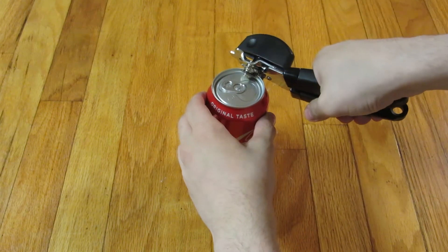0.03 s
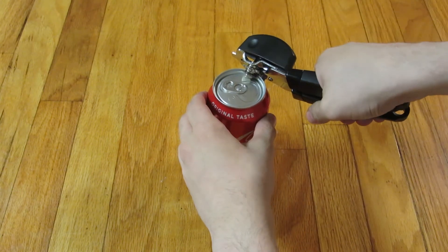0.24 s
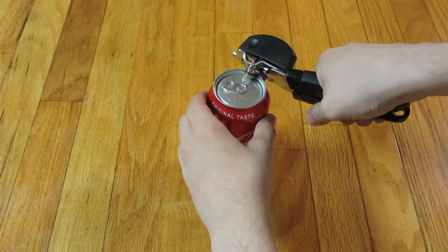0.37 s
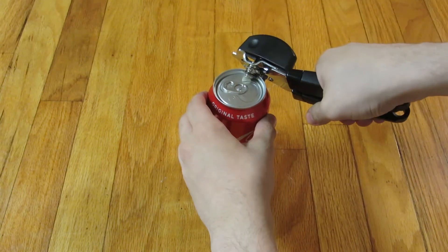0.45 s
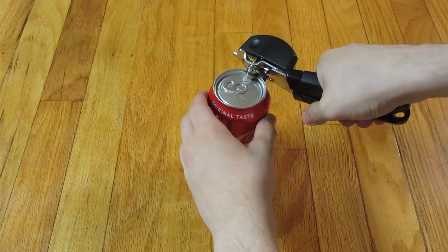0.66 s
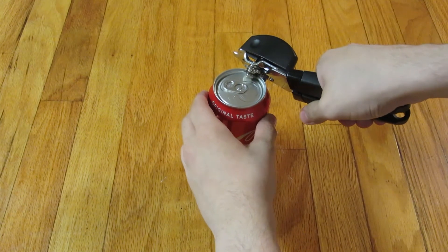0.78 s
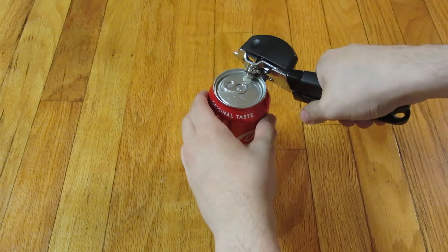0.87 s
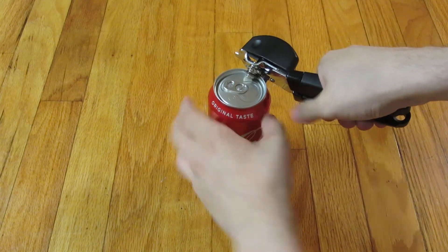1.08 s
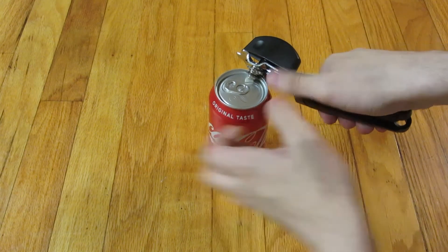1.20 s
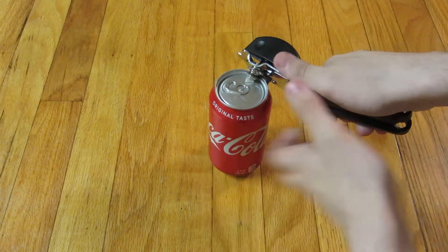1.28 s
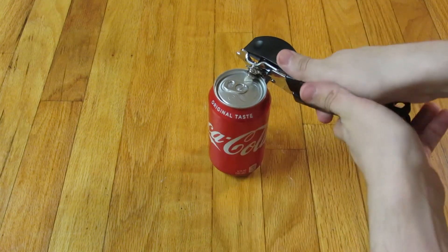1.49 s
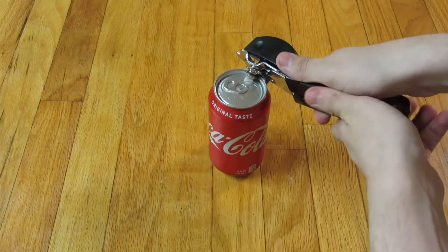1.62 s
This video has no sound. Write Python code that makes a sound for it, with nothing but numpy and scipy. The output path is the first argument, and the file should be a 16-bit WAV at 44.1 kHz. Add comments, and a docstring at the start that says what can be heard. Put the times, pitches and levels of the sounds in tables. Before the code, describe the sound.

One sharp crack comes as an opener's blade punctures a soda can on a wooden floor in a small room. A thin, sputtering fizz follows, with faint ticks and hand rubbing, before opening into a stronger high hiss.

```python
"""Piercing a can of fizzy drink

A hand opener bites into the rim of a can on a wooden floor, in a small live room. The blade snaps
through, an impulse that sets lid, opener and floorboards ringing. Gas seeps from the wet cut as
turbulent noise, spitting and whistling in short sputters. The tool ticks faintly as the grip
changes, then the cut widens and the gas hisses freely."""
import sys
import numpy as np
from scipy import signal
from scipy.fft import rfft, irfft
from scipy.io import wavfile
from scipy.ndimage import uniform_filter1d

SR = 44100
rng = np.random.default_rng(int(sys.argv[2]) if len(sys.argv) > 2 else 0)


def master_out(mix):
    """Clip the mix to full scale and print it as 16-bit PCM to the path in sys.argv[1]."""
    frames = np.transpose(np.atleast_2d(mix))
    ceiling = np.clip(frames, -1, 1)
    pcm = np.round(ceiling * 32767).astype(np.int16)
    wavfile.write(sys.argv[1], SR, pcm)


N = 72765

# Spectrum of the room noise. Each row: frequency in Hz, relative level in dB.
AIR_COLOUR = [(15, -21.5), (30, -12.5), (55, -9), (85, -10.5), (190, -14.5), (240, -12), (300, -13.5),
              (400, -8.5), (500, -12), (1000, -11.5), (2200, -20.5), (5000, -24.5), (8000, -29),
              (9000, -29.5), (15500, -38)]
# Likeness of that noise at the two ears. Each row: frequency in Hz, correlation.
AIR_CORRELATION = [(40, -.45), (120, -.2), (250, -0.42), (550, -0.84), (1200, -0.77), (3000, -0.69),
                   (12000, -0.51)]
# Balance of that noise. Each row: frequency in Hz, left minus right in dB.
AIR_BALANCE = [(40, -4.5), (250, -2.5), (600, 0), (2000, 0), (10000, 0)]
# Modes of lid, can and opener. Each row: frequency in Hz, relative level in dB, T60 in seconds.
METAL_MODES = [(387, -24, .06), (586, -27.5, 0.077), (1144, -20.5, 0.031), (1448, -21.5, 0.05),
               (2246, -25.5, .035), (2343, -14, .045), (2514, -8, 0.036), (2706, -20, 0.026),
               (2860, -19.5, 0.039), (3220, -13, 0.027), (3930, -20, 0.04), (4330, -13.5, 0.045),
               (4580, -19.5, 0.03), (4984, -10.5, 0.042), (5457, -18, .04), (6440, -23.5, .03),
               (6870, -25, 0.045), (8470, -20.5, 0.044)]
# Modes of the floorboards. Each row: frequency in Hz, level in dB, T60 in seconds.
FLOOR_MODES = [(165, -43, 0.145), (237.5, -37, 0.14), (265.7, -39.5, 0.29), (368.3, -44, .3),
               (404, -47.5, .35)]
# Spectrum of tearing metal. Each row: frequency in Hz, relative level in dB.
CRACK_COLOUR = [(150, -31.5), (500, -9), (800, -17), (1200, -8.5), (2000, -2), (2600, -2.5), (4800, 1.5),
                (9000, -7), (13000, -10), (16000, -18)]
# Gas seeping through the narrow cut. Each row: time in seconds, level in dB.
SEEP_LEVELS = [(.21, -63), (.29, -55.5), (.45, -59.5), (.54, -76), (.66, -58.5), (.74, -63), (.78, -61),
               (.95, -60.5), (1.07, -55), (1.125, -61.5), (1.21, -58), (1.28, -58), (1.33, -57),
               (1.39, -56), (1.44, -53), (1.65, -70)]
# Spectra of the seep, the jet and its lower rush. Each row: frequency in Hz, relative level in dB.
SEEP_COLOUR = [(1500, -33), (5000, -20.5), (7500, -9.5), (9500, -5), (12300, -0.5), (14000, -6),
               (16000, -7)]
JET_COLOUR = [(500, -13), (2000, -28), (4000, -17.5), (8200, -11.5), (9700, 0.5), (12000, 1), (14000, -4.5),
              (16000, -4)]
RUSH_COLOUR = [(1500, -23), (3300, 1.5), (5000, -1), (8000, 1), (11000, -12)]
# The loudest spits of liquid. Each row: start in seconds, level in dB.
LOUD_SPITS = [(0.577, -49), (0.61, -54), (.664, -54), (.690, -42), (0.749, -43), (0.795, -49), (.812, -41),
              (0.857, -44.5), (0.983, -49), (1.025, -42), (1.087, -44), (1.448, -36), (1.4592, -24.5)]
# Spectrum of a bursting bubble. Each row: frequency in Hz, relative level in dB.
SPIT_COLOUR = [(3000, -49), (7500, -1.5), (10000, 5.5), (13000, 10), (16000, 0)]
# Whistle of the wet cut. Each row: time in seconds, centre pitch in Hz, level in dB.
WHISTLE_PATH = [(.475, 11000, -56), (0.491, 10900, -50), (0.528, 10900, -48.5), (.555, 10000, -52),
                (0.602, 9850, -49), (0.628, 9600, -55), (.66, 8900, -59), (.69, 10100, -56),
                (.745, 10100, -53.5), (.755, 10100, -72)]
# Lone chirps of the cut. Each row: start in seconds, length in seconds, pitch in Hz, level in dB.
LONE_CHIRPS = [(0.798, 0.021, 8500, -59.5), (1.06, 0.021, 12700, -49.5), (1.158, .05, 11800, -55.5),
               (1.218, 0.022, 11100, -51), (1.237, 0.035, 11400, -54), (1.293, 0.017, 10100, -51.5),
               (1.307, 0.023, 9780, -44.5), (1.33, 0.056, 10350, -61)]
# Hands rubbing on can and handle. Each row: time in seconds, level in dB.
RUB_LEVELS = [(.9, -67), (1.059, -61), (1.19, -57.5), (1.3, -65), (1.451, -60.5), (1.65, -57)]
# Spectrum of the rubbing. Each row: frequency in Hz, relative level in dB.
RUB_COLOUR = [(40, -4), (110, -9), (165, 4), (260, -4.5), (500, -7.5), (1250, -13), (1450, -7), (1800, -16),
              (3500, -13), (7000, -19), (10000, -28)]
# Ticks of the opener. Each row: start in seconds, level in dB, T60 in seconds.
OPENER_TICKS = [(1.098, -42, 0.06), (1.184, -44, 0.079), (1.212, -56, 0.039), (1.251, -52, 0.11)]
# Spectrum of a tick. Each row: frequency in Hz, relative level in dB.
TICK_COLOUR = [(60, -14), (160, 5), (260, 2), (700, -3), (1300, -6), (1460, 13), (1650, -5.5), (3100, -2.5),
               (3450, 4.5), (3900, -8.5), (8000, -2), (12000, -18), (16000, -33)]
# Reverberation. Each row: band centre in Hz, relative level in dB, T60 in seconds.
ROOM_BANDS = [(125, -7, 0.15), (305, 3.5, 0.4), (700, -2.5, 0.32), (1410, -2.5, 0.49), (2680, -12.5, 0.46),
              (5100, -8.5, 0.49), (9300, -10.5, 0.28), (15000, -11.5, 0.15)]
# Likeness of the reflections at the two ears. Each row: frequency in Hz, correlation.
ECHO_CORRELATION = [(200, .1), (500, -0.23), (1200, 0.35), (2400, 0.82), (5000, 1), (12000, .4)]

SNAP_S = .2127  # the blade breaks through
TIME = np.arange(N) / SR


def undb(db):
    """Amplitude ratio for a level in decibels."""
    return 10 ** (np.asarray(db) / 20)


def unit(x):
    """Normalisation to rms 1."""
    return x / np.sqrt(np.mean(x ** 2))


def across(points):
    """Interpolation of (Hz, value) rows over the spectrum, in log frequency."""
    hz, value = np.array(points, float).T
    return np.interp(np.log(np.arange(N // 2 + 1) * SR / N + 1e-9), np.log(hz), value)


def noise(colour):
    """White noise filtered to a given spectrum, at rms 1."""
    return unit(irfft(rfft(rng.standard_normal(N)) * undb(across(colour)), N))


def diffuse(correlation):
    """A diffuse field: left and right spectra of partly correlated white noise."""
    likeness = np.clip(across(correlation), -.99, .99)
    mid, side = rfft(rng.standard_normal((2, N))) * np.sqrt([(1 + likeness) / 2, (1 - likeness) / 2])
    return np.array([mid + side, mid - side])


def wander(rate_hz):
    """Smooth random fluctuation of rms 1."""
    hold = max(int(SR / rate_hz), 1)
    steps = rng.standard_normal(N)[np.arange(N) // hold]
    return unit(uniform_filter1d(steps, hold))


def fade(start, t60):
    """Exponential decay from a sudden onset, 60 dB in t60 seconds."""
    age = TIME - start
    return (age >= 0) * np.exp(-np.log(1000) * np.maximum(age, 0) / t60)


def rise(start, length):
    """Linear ramp from 0 to 1."""
    return np.clip((TIME - start) / length, 0, 1)


def pan(db):
    """Gains for a level difference between the ears, left minus right."""
    return undb(np.array([[1], [-1]]) * db / 2)


def air(level_db=-47.5):
    """Steady room noise forms a diffuse field, its rumble stronger on the right."""
    spectra = diffuse(AIR_CORRELATION) * undb(across(AIR_COLOUR)) * pan(across(AIR_BALANCE))
    return undb(level_db) * unit(irfft(spectra, N))


def ring(modes):
    """Free vibration after the snap is a sum of damped normal modes."""
    return sum(undb(db) * np.cos(2 * np.pi * hz * (TIME - SNAP_S)) * fade(SNAP_S, t60)
               for hz, db, t60 in modes)


def snap(pop_hz=2760, pop_s=.00152, cutoff_hz=240):
    """Impulse excitation: the lid pops and tears, and the metal and floorboards ring."""
    pulse = np.sin(np.pi * rise(SNAP_S, pop_s))
    pop = undb(-2.5) * np.cos(2 * np.pi * pop_hz * (TIME - SNAP_S)) * pulse
    crack = undb(-13) * noise(CRACK_COLOUR) * fade(SNAP_S, t60=.022)
    metal = undb(-5.5) * ring(METAL_MODES) * rise(SNAP_S, .00069)
    floor = ring(FLOOR_MODES) * rise(SNAP_S, .0094)
    # The snap carries little below a few hundred hertz.
    highpass = signal.butter(2, cutoff_hz, "high", fs=SR, output="sos")
    return signal.sosfilt(highpass, pop + crack + metal) + floor


def hiss(widen_s=1.43, flutter_hz=129):
    """Turbulent flow radiates noise: gas seeps unevenly, then jets out as the cut widens."""
    seep_db = np.interp(TIME, *np.array(SEEP_LEVELS).T)
    seep = undb(seep_db + 2 * wander(flutter_hz)) * (TIME > SNAP_S)
    jet = rise(widen_s, .013) * undb(-41.5 + 1.5 * wander(flutter_hz))
    rush = rise(widen_s, .15) * undb(-52.5)
    return seep * noise(SEEP_COLOUR) + jet * noise(JET_COLOUR) + rush * noise(RUSH_COLOUR)


def spits(bubbles_per_s=110, fizz_from_s=.22, fizz_until_s=1.3, t60=.0064):
    """Bursting bubbles emit brief noise transients: a few loud ones among a Poisson fizz."""
    bursts = sum(undb(db) * fade(start, t60) for start, db in LOUD_SPITS)
    births = (rng.random(N) < bubbles_per_s / SR) * (TIME > fizz_from_s) * (TIME < fizz_until_s)
    strengths = undb(-54 + 3 * rng.standard_normal(N))
    fizz = signal.fftconvolve(births * strengths, fade(0, t60))[:N]
    return (bursts + fizz) * noise(SPIT_COLOUR)


def whistles(sputter_hz=59.2, open_share=.55, jitter=.2, sag=.017, wobble=.03):
    """Liquid acts as a valve on the cut; each opening passes a short, unsteady, falling whistle."""
    times, hz, db = np.array(WHISTLE_PATH).T
    cycle = np.cumsum(sputter_hz * (1 + jitter * wander(sputter_hz))) / SR % 1
    progress = np.minimum(cycle / open_share, 1)
    valve = np.sqrt(np.abs(np.sin(np.pi * progress)))
    level = np.interp(TIME, times, undb(db), left=0, right=0)
    falling_hz = np.interp(TIME, times, hz) * (1 - sag * (progress - .5))
    pitch_hz = falling_hz * (1 + wobble * wander(rate_hz=1200))
    return valve * level * np.sqrt(2) * np.sin(2 * np.pi * np.cumsum(pitch_hz) / SR)


def chirps(bandwidth_hz=1200):
    """Turbulent puffs excite a resonance of the cut, giving narrow-band noise."""
    turbulence = wander(bandwidth_hz) + 1j * wander(bandwidth_hz)
    sound = 0
    for start, length, hz, db in LONE_CHIRPS:
        puff = undb(db) * np.sin(np.pi * rise(start, length))
        sound += puff * np.real(turbulence * np.exp(2j * np.pi * hz * TIME))
    return sound


def rubbing():
    """Sliding friction of the hands makes dull noise as the grip changes."""
    times, db = np.array(RUB_LEVELS).T
    return np.interp(TIME, times, undb(db), left=0) * noise(RUB_COLOUR)


def ticks(rise_s=.0028):
    """Each shift of the opener on the rim excites a damped noise transient."""
    envelope = sum(undb(db) * fade(start, t60) * rise(start, rise_s) for start, db, t60 in OPENER_TICKS)
    return envelope * noise(TICK_COLOUR)


def room(source, build_s=.0035):
    """Reverberation is convolution with diffuse reflections, each band decaying at its own rate."""
    field, response = diffuse(ECHO_CORRELATION), 0
    for hz, db, t60 in ROOM_BANDS:
        band = across([(row[0], row[0] == hz) for row in ROOM_BANDS])
        tail = fade(0, t60) * rise(build_s / 2, build_s)
        response += undb(db) * irfft(field * band, N) * tail / np.linalg.norm(tail)
    return signal.fftconvolve(source[None], response, axes=1)[:, :N]


def scene():
    """Superposition of can, gas and reflections, a little to the right, over the room noise."""
    solids = snap() + ticks() + rubbing()
    gas = hiss() + whistles() + chirps() + spits()
    reflections = room(solids + undb(5.5) * gas)
    return (solids + gas + reflections) * pan(db=-4) + air()


def record(dry, top_hz=15750):
    """Overload clips the snap at full scale; a steep low-pass removes the highest treble."""
    lowpass = signal.ellip(10, .2, 70, top_hz, fs=SR, output="sos")
    return signal.sosfilt(lowpass, np.clip(dry, -1, 1))


dry = scene()
out = record(dry)
master_out(out)
```